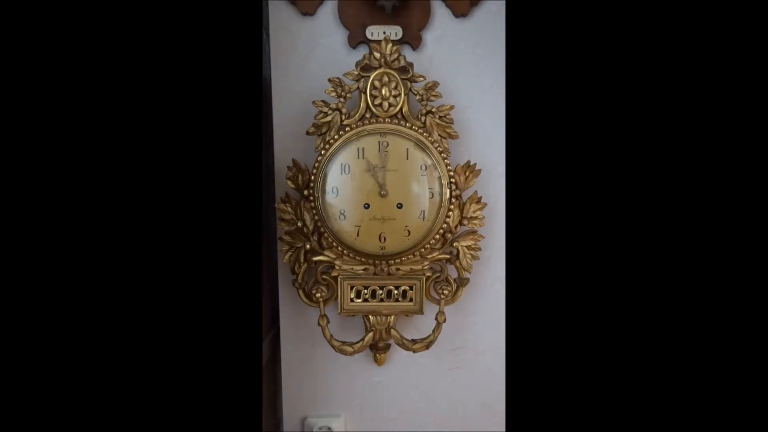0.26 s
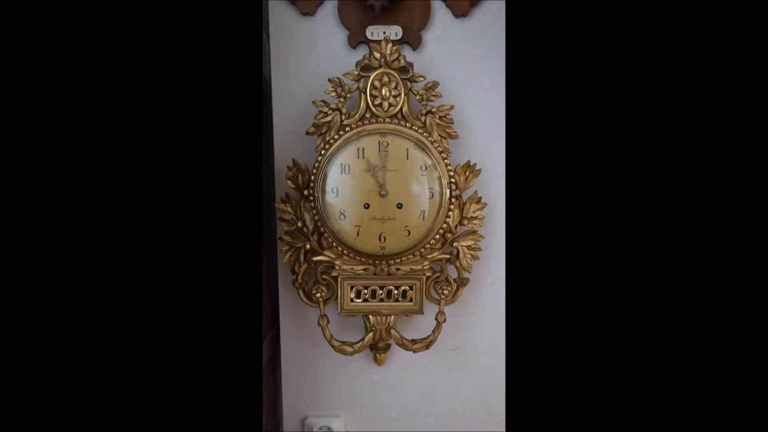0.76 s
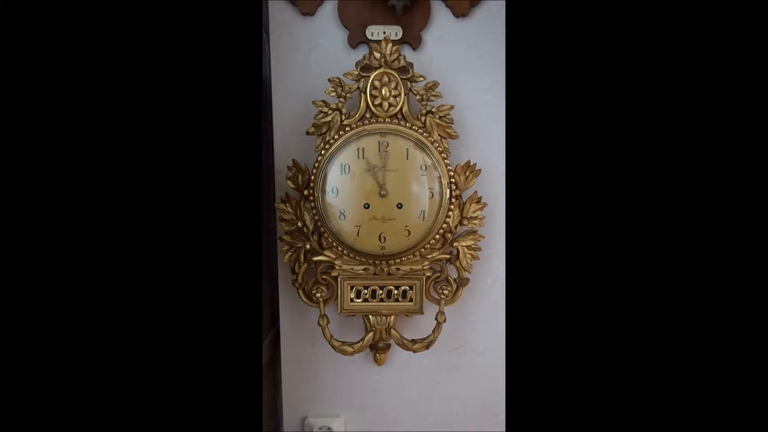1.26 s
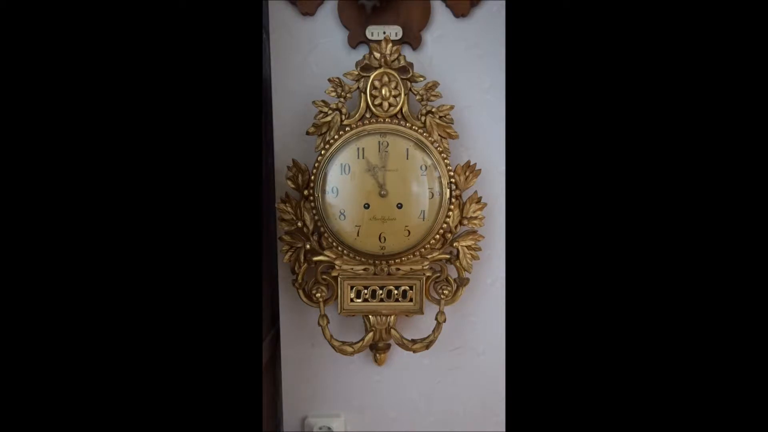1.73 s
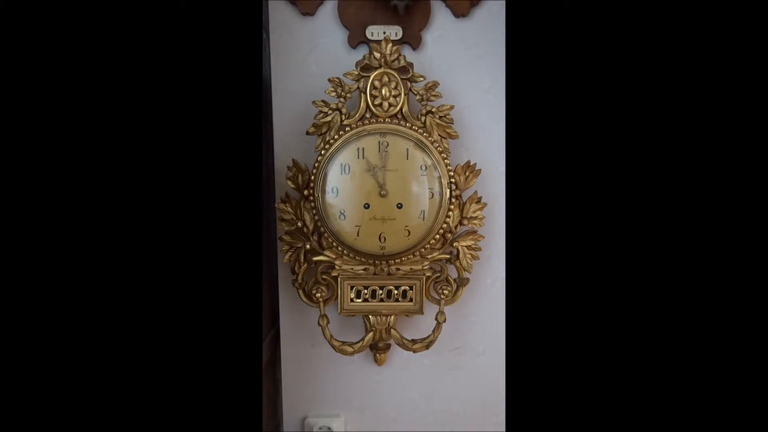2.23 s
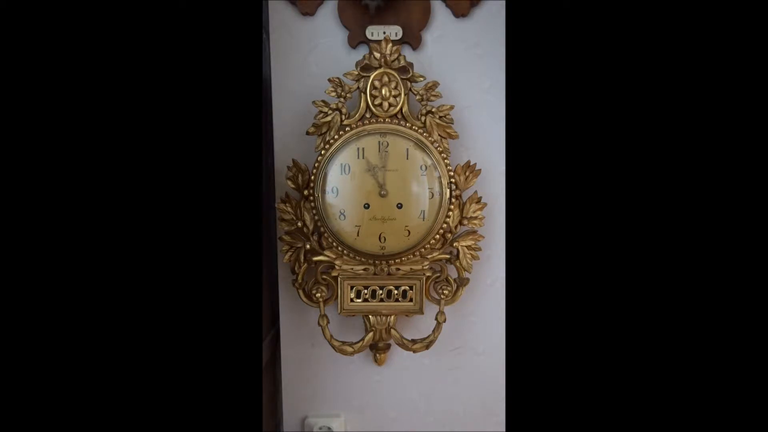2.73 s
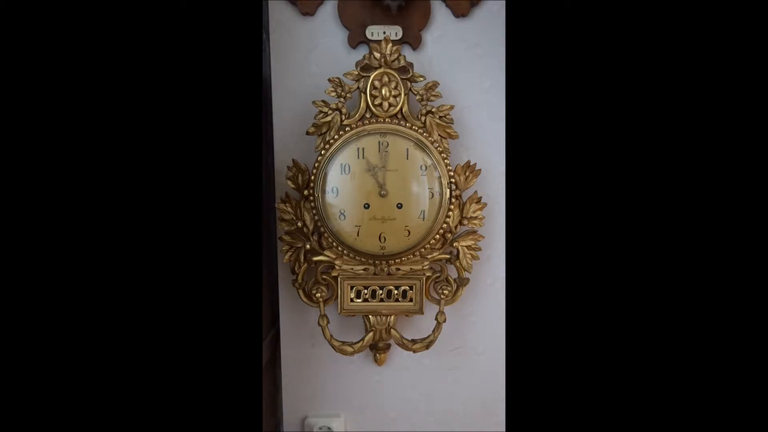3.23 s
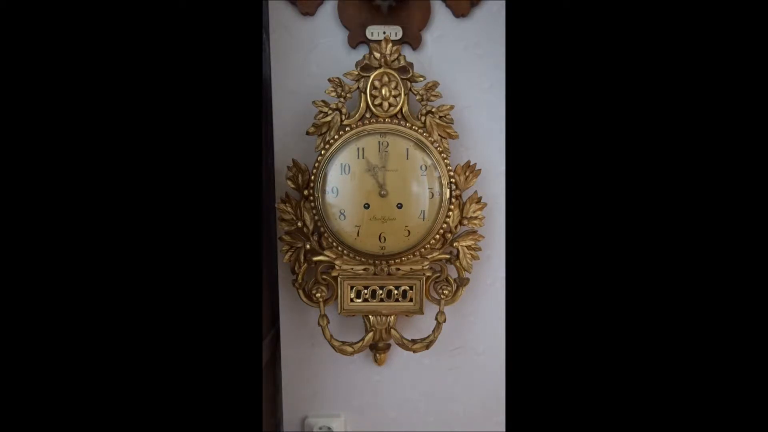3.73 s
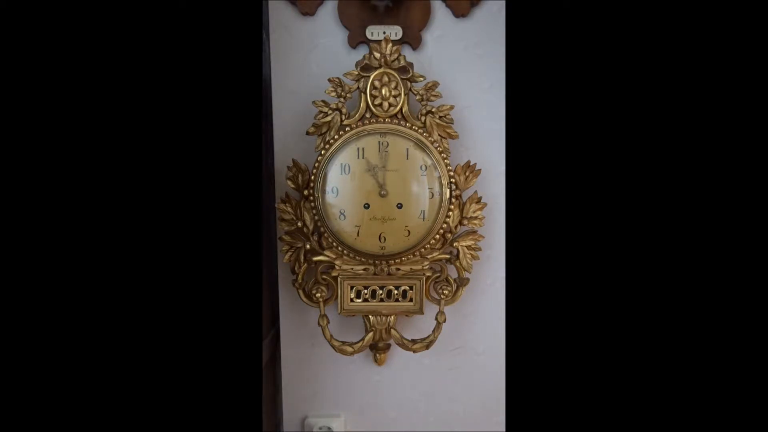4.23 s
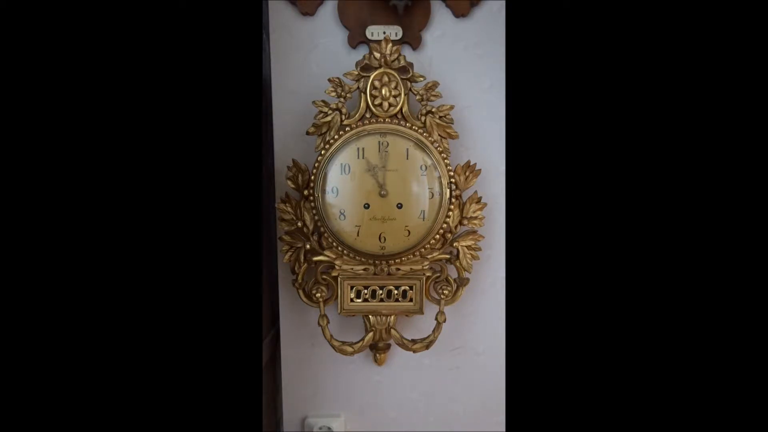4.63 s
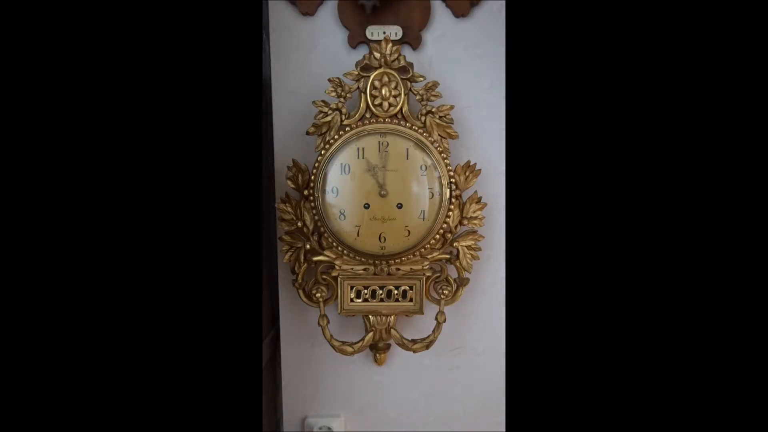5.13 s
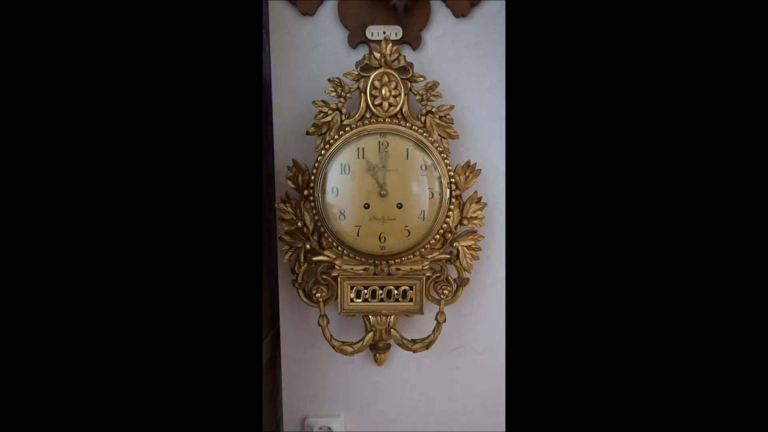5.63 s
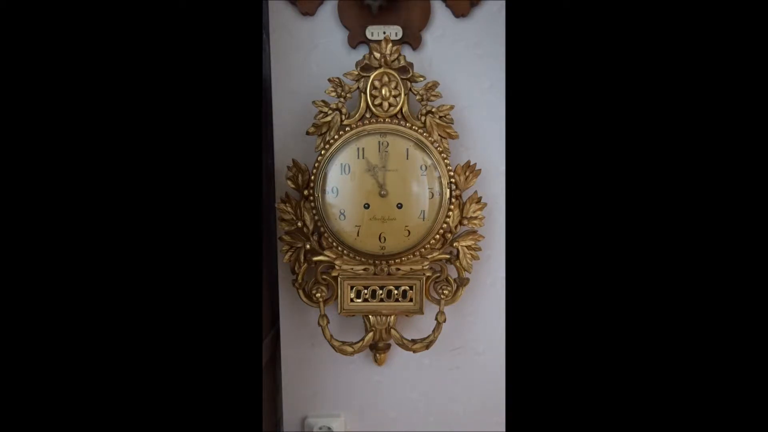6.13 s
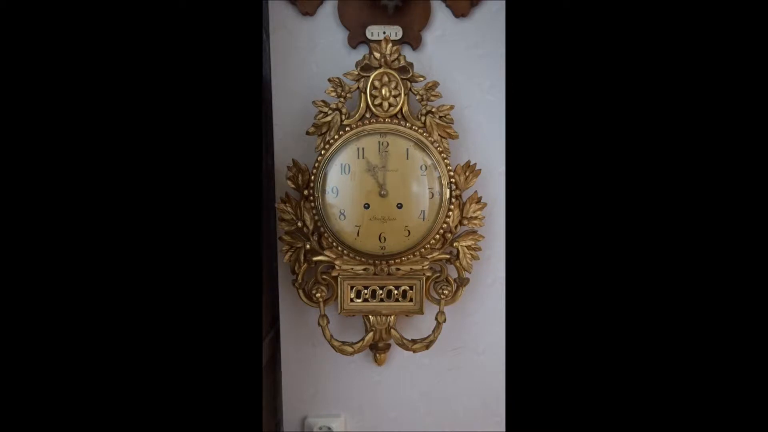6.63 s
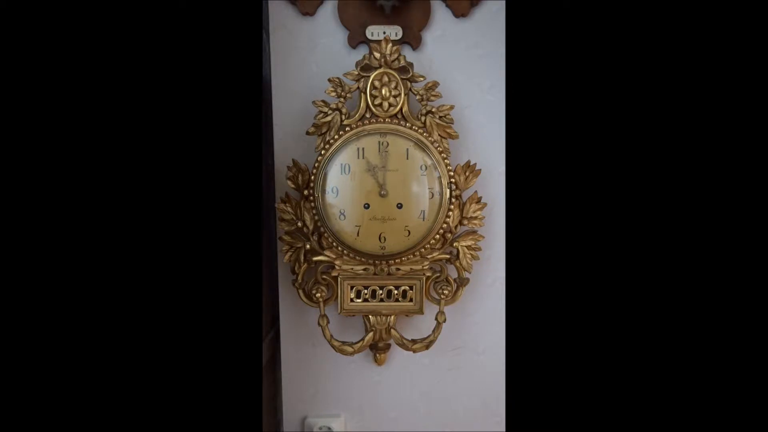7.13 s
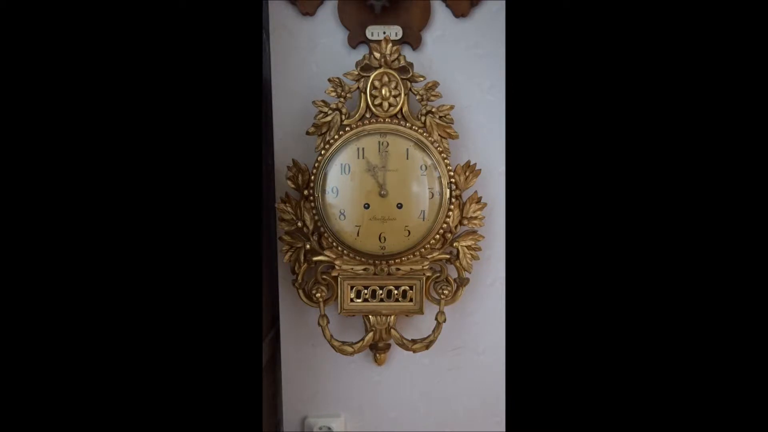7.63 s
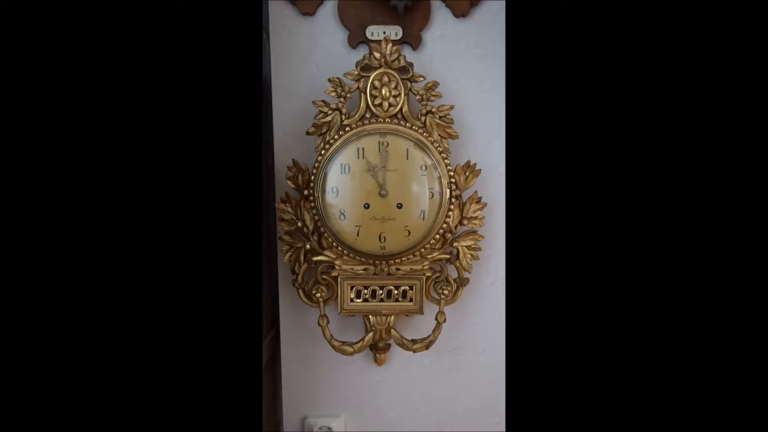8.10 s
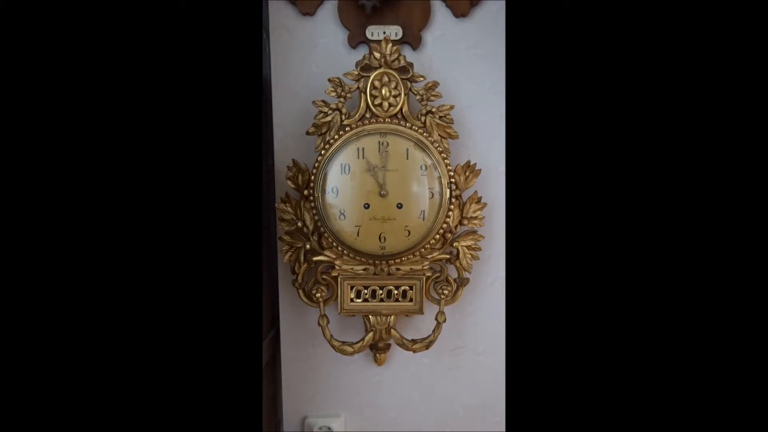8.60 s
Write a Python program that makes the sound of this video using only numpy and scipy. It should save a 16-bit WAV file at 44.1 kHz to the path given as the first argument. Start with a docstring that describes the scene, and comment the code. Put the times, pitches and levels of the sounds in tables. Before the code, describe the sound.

Quiet room, wall clock up close: latch clatter, uneven gear whirr, then six evenly spaced high metallic strikes, each with a lever click before it.

```python
"""A quiet indoor room, in stereo: dull room air, a far drone, and a wall clock with a wooden case.
The clock's glass door is shut, its striking train whirrs up, levers tick and the case thuds: all shaped noise.
A hammer strikes a small bright bell six times and chatters on it after each stroke.
The bell is four decaying tones, three of them beating against detuned twins, plus weak short-lived modes.
"""
import sys
import numpy as np
from scipy import signal
from scipy.fft import rfft, irfft, next_fast_len
from scipy.io import wavfile

SR = 44100
rng = np.random.default_rng(int(sys.argv[2]) if len(sys.argv) > 2 else 0)


def store_wav(level_fs):
    """Save 16-bit WAV to argv[1]."""
    pcm = np.round(np.clip(np.atleast_2d(level_fs), -1, 1) * 32767)
    wavfile.write(sys.argv[1], SR, pcm.T.astype(np.int16))


N = 390726
T = np.arange(N) / SR  # time of every sample [s]


def from_db(db):
    """Turn decibels into an amplitude factor."""
    return 10 ** (np.asarray(db) / 20)


def at_hz(points, hz):
    """Read a spectrum on a log-frequency axis."""
    f, value = np.transpose(points)
    return np.interp(np.log(hz + 1e-9), np.log(f), value)


def lagged(x, seconds):
    """One-pole smoothing with the given time constant."""
    r = np.exp(-1 / (seconds * SR))
    return signal.lfilter([1 - r], [1, -r], x)


def drift(rate, size=1):
    """Random curves from `rate` normal draws of spread 1 per second, joined by straight lines."""
    knots = rng.standard_normal((size, 4000))
    return np.array([np.interp(T * rate, np.arange(len(k)), k) for k in knots])


# How alike noise reaches the left and right of the microphone: (frequency [Hz], likeness [0-1])
LIKENESS = [(40, 1), (130, 0.85), (300, 0.85), (600, 0.33), (1000, 0.72), (2500, 0.47), (6000, 0.91),
            (15000, 1)]


def noise(colour, peaks=(), ripple_db=3.0, ripple_hz=14):
    """Stereo noise of rms 1 with a broad colour, narrow resonances and the fine ripple of a room's response."""
    size = next_fast_len(N)
    hz = np.arange(size // 2 + 1) * SR / size
    db = at_hz(colour, hz)
    for f, width, lift in peaks:
        db = db + lift / (1 + (2 * (hz - f) / width) ** 2)
    ripple = rng.standard_normal(4000)
    ripple_depth_db = ripple_db * np.minimum(hz / 1500, 1)
    db = db + ripple_depth_db * np.interp(hz / ripple_hz, np.arange(len(ripple)), ripple)
    alike = np.clip(at_hz(LIKENESS, hz), 0, 1)
    mid, side = rfft(rng.standard_normal((2, size)))
    left_right = np.sqrt(1 + alike) * mid + np.sqrt(1 - alike) * side * [[1], [-1]]
    out = irfft(from_db(db) * left_right, size)[:, :N]
    return out / out.std()


ROOM_T60_S = 0.57


def bursts(events, t60, room_db, rise_s):
    """Envelope of contacts: all die at one given rate and leave a tail in the room; the rise is smoothed."""
    power = np.zeros(N)
    for s, db in events:
        power[int(s * SR)] += from_db(db) ** 2

    def decaying(seconds):
        return signal.lfilter([1], [1, -from_db(-60 / (seconds * SR)) ** 2], power + 1e-18)

    direct, tail = decaying(t60), decaying(ROOM_T60_S)
    return np.sqrt(lagged(direct + from_db(room_db) ** 2 * tail, rise_s))


def after(times, pattern):
    """Repeat a pattern of (delay [s], level [dB]) after each of the times."""
    return [(s + delay, db) for s in times for delay, db in pattern]


def latest(times):
    """For every sample: which of the times came last, and the seconds since."""
    which = np.maximum(np.searchsorted(times, T) - 1, 0)
    return which, np.maximum(T - times[which], 0)


# Far drone, before its overall gain: (time [s], level [dB])
DRONE = [(0.16, -45), (0.22, -44.5), (1.23, -45.5), (1.78, -57), (1.8, -50.5), (2.61, -53), (2.98, -43),
         (3.42, -55.5), (5.3, -58)]
# Colour of the room air: (frequency [Hz], relative density [dB])
ROOM_TONE = [(20, -9), (40, -29), (70, -5), (120, -1.5), (230, -0.5), (350, 2.5), (550, -9), (1000, -8),
             (2000, -18), (4000, -20), (8000, -30.5), (16000, -35)]
DRONE_START_HZ, DRONE_END_HZ, DRONE_RISE_S = 54, 65.2, 3.6
DRONE_FADE_DB_PER_S = 12  # after the last level in the table


def room(tone_db=-45.5, drone_gain_db=1.0):
    """Dull noise for the room air, and a far sine drone whose pitch climbs, levels off and at last fades away."""
    s, db = np.transpose(DRONE)
    hz = np.interp(T, [0, DRONE_RISE_S], [DRONE_START_HZ, DRONE_END_HZ])
    fade_db = DRONE_FADE_DB_PER_S * np.maximum(T - s[-1], 0)
    level = from_db(drone_gain_db + np.interp(T, s, db) - fade_db)
    drone = np.sqrt(2) * level * np.sin(2 * np.pi * np.cumsum(hz) / SR)
    return drone + from_db(tone_db) * noise(ROOM_TONE)


# The lifting lever drops before every stroke: (time [s], level [dB])
LEVER_DROPS = [(1.678, -29.5), (2.911, -30), (4.125, -31), (5.3335, -32.5), (6.554, -31.5), (7.778, -30.5)]


def lever_drops():
    """Times at which the lifting lever drops."""
    return np.array(LEVER_DROPS)[:, 0]


# Stray soft knocks of the works: (time [s], level [dB])
KNOCKS = [(1.0, -38.5), (1.12, -40.5), (1.821, -43), (2.13, -40.5), (3.87, -40), (8.46, -44)]
# Soft booms of the hollow case: (time [s], level [dB])
BOOMS = [(.75, -40.5), (2.3, -44), (7.8, -41), (7.88, -33.5)]
# Colours of gear train, fan, lever, pendulum and boom: (frequency [Hz], relative density [dB])
TRAIN = [(100, -11.5), (220, 3), (360, 1.5), (540, -17), (760, -11.5), (930, 9.5), (1090, 2), (1350, -17),
         (1700, -10), (2050, -0.5), (2700, -33.5), (7000, -26.5), (16000, -34.5)]
FAN = [(300, -18), (1500, -22), (3000, -5.5), (7000, 3.5), (9500, -7.5), (11500, 5.5), (14500, 2.5),
       (16000, -8.5)]
LEVER = [(200, -10.5), (1000, 2), (1600, 9.5), (3000, -12), (5500, -7), (9000, -7), (12000, 3),
         (16000, -8.5)]
TICK_TOCK = [(200, -17), (1000, -2.5), (2200, -5), (3500, -0.5), (4800, -10.5), (8000, -10.5), (15000, -16)]
BOOM = [(60, -27), (150, -16.5), (235, -5.5), (330, -17), (500, -27.5), (1500, -34), (16000, -66)]
# Narrow metallic resonances of the movement: (frequency [Hz], width [Hz], lift [dB])
WORKS = [(2850, 150, 9), (4000, 180, 7.5), (5170, 660, 7), (6700, 130, 8.5), (7985, 670, 11.5),
         (8610, 390, 12), (11820, 450, 9), (13050, 260, 5)]
# Low resonances of the wooden case: (frequency [Hz], width [Hz], lift [dB])
CASE_MODES = [(148, 12, -0.5), (214, 16, 4.5), (250, 25, 5), (285, 25, -13), (314, 16, 5.5), (351, 4, 7),
              (630, 12, 14), (940, 72, 0.5), (973, 47, -4.5), (1069, 34, 8)]
# The train's level ramps up on release; the load and flutter in movement() act on top of these levels
RELEASE_S, SPIN_UP_S, IDLE_DB, RUNNING_DB = .5, .3, -50.5, -43.5
# The pendulum's uneven tick-tock: first tick, full swing, tick to tock
FIRST_TICK_S, SWING_S, TOCK_S, PENDULUM_DB = .533, 1.85, .992, -42.5
# The lever bounces once after it drops
LEVER_BOUNCE_S, LEVER_BOUNCE_LOSS_DB = 0.015, 8


def movement(flutter_db=2.0, flutter_rate=22, load_db=3.0, fan_db=-49):
    """The gear train whirrs unevenly, louder while it lifts the hammer; levers tick and the pendulum swings."""
    lifting = sum(np.exp(-((T - s + 0.11) / 0.23) ** 2) for s in blows())  # peaks 0.11 s before a blow
    running = from_db(np.interp(T, [RELEASE_S, RELEASE_S + SPIN_UP_S], [IDLE_DB, RUNNING_DB]))
    uneven = from_db(load_db * (lifting - 1) + flutter_db * drift(flutter_rate))
    gears = running * uneven * noise(TRAIN, CASE_MODES)
    fan = from_db(fan_db) * running / np.median(running) * noise(FAN, WORKS)

    bounces = [(s + LEVER_BOUNCE_S, db - LEVER_BOUNCE_LOSS_DB) for s, db in LEVER_DROPS]
    ticks = bursts(LEVER_DROPS + bounces, t60=0.035, room_db=-15.0, rise_s=.0006) * noise(LEVER, WORKS)

    first_tick_and_tock = (FIRST_TICK_S, FIRST_TICK_S + TOCK_S)
    escapes = [(s, PENDULUM_DB) for first in first_tick_and_tock for s in np.arange(first, N / SR, SWING_S)]
    tick_tock = bursts(escapes, t60=0.087, room_db=-5.5, rise_s=.002) * noise(TICK_TOCK)

    all_knocks = after(lever_drops(), [(.008, -38.5)]) + KNOCKS  # each lever drop also knocks
    knocks = bursts(all_knocks, t60=0.093, room_db=-0.5, rise_s=0.0015) * noise(DOOR_COLOUR)
    booms = bursts(BOOMS, t60=0.55, room_db=-5.5, rise_s=0.009) * noise(BOOM, CASE_MODES)
    return gears + fan + ticks + tick_tock + knocks + booms


# The door meets its rim and latches: (time [s], level [dB])
DOOR = [(.214, -25.5), (.229, -24.5), (.238, -24.5), (.251, -30)]
# The case settles after the door has shut: (time [s], level [dB])
SETTLING = [(.30, -37.5), (.41, -38)]
# Colours of door (also of the knocks) and settling wood: (frequency [Hz], relative density [dB])
DOOR_COLOUR = [(35, -36), (60, -3.5), (149, -19), (238, 0.5), (308, -4), (380, -4.5), (749, -13), (903, 2),
               (1550, -21), (2350, -10), (2840, -23), (5460, -22), (6000, -27), (7060, -20), (16000, -24)]
WOOD = [(100, -13), (350, -2.5), (600, -4), (850, -20), (1400, -14), (2500, -17.5), (6000, -31),
        (16000, -41)]


def door():
    """The glazed brass door closes with a short resonant clatter and the case settles with duller noise."""
    # (frequency [Hz], width [Hz], lift [dB])
    resonances = [(245, 26, 3.1), (927, 63, 3.6), (2380, 30, 7.9), (2560, 62, 8.7)]
    latch = bursts(DOOR, t60=0.13, room_db=-12, rise_s=0.0017) * noise(DOOR_COLOUR, resonances)
    return latch + bursts(SETTLING, t60=0.47, room_db=-13, rise_s=0.028) * noise(WOOD)


# The hammer arm falls back and shakes the case: (time after the blow [s], level [dB])
THUDS = [(.023, -36.5), (.075, -37.5)]
# The arm clatters against its stop: (time after the blow [s], level [dB])
CLATTER = [(.074, -36.5)]
# Stray scrapes of the works: (time [s], level [dB])
SCRAPES = [(1.1, -47.5), (3.86, -47), (6.716, -44), (8.46, -50)]
# Colours of hammer click, scrape (also the clatter) and case: (frequency [Hz], relative density [dB])
CLICK = [(100, -13), (500, -31), (750, -17.5), (990, 10), (1350, -7), (2000, -19), (3000, -12.5),
         (3750, -1.5), (4250, -4), (5100, 1.5), (6000, -3.5), (8000, 1), (13000, -7), (16000, -6)]
SCRAPE = [(200, -21.5), (700, 2), (1400, 5.5), (2300, 5), (3000, 1.5), (4200, 3.5), (6000, -23),
          (15000, -23.5)]
CASE = [(30, -21.5), (55, -12.5), (78, 7.5), (120, -7.5), (230, 0), (350, 7), (530, -13), (900, -6),
        (1500, -15.5), (2300, -19.5), (3500, -13), (6000, -38), (16000, -35.5)]


def hammer(click_gain_db=-1, rattle_db=3.0, rattle_rate=160):
    """Hard clicks of metal on metal, clatter and scrapes, and the duller rattling of the wooden case."""
    contacts = bursts(touches(), t60=0.046, room_db=-14.0, rise_s=0.00029)
    clicks = from_db(click_gain_db) * contacts * noise(CLICK, WORKS)
    clatter = bursts(after(blows(), CLATTER), t60=0.19, room_db=-7.5, rise_s=0.0033)
    all_scrapes = after(lever_drops(), [(.001, -51)]) + SCRAPES  # each lever drop also scrapes
    scrapes = bursts(all_scrapes, t60=0.33, room_db=-4, rise_s=0.0036)
    shaking = bursts(after(blows(), THUDS), t60=0.8, room_db=-2, rise_s=0.0049)
    shaking = shaking * from_db(rattle_db * drift(rattle_rate))
    return clicks + (clatter + scrapes) * noise(SCRAPE) + shaking * noise(CASE, CASE_MODES)


# Weak, short-lived modes of bell and hammer: (frequency [Hz])
OVERTONE_HZ = [935, 4900, 5120, 6740, 8125, 8191, 12130, 12214, 12390, 12913]
# The same modes, before a random spread: (level against the touch [dB], t60 [s])
OVERTONES = [(-16.5, 0.14), (-15, 0.083), (-35, 0.057), (-15.5, 0.032), (-26, 0.17), (-26, .2), (-19, .1),
             (-14, 0.14), (-8, 0.19), (-16.5, .13)]


def overtones(spread_db=6.5):
    """Each touch rings the weak modes as two-pole resonators, every time with randomly different strengths."""
    s, touch_db = touches().T
    out = np.zeros((2, N))
    for hz, (db, t60) in zip(OVERTONE_HZ, OVERTONES):
        impulses = np.full((2, N), 1e-18)
        random_db = spread_db * rng.standard_normal((len(s), 2)).T
        impulses[:, (s * SR).astype(int)] = from_db(touch_db + db + random_db)
        r = np.exp(-np.log(1000) / (t60 * SR))
        w = 2 * np.pi * hz / SR
        out += signal.lfilter([0, np.sin(w)], [1, -2 * r * np.cos(w), r * r], impulses)
    return out


# The six strokes: (time [s], strength, added to partials 1-3 while under the hammer [dB], rebound level [dB],
# ring left in partials 1, 2, 3, 4 [dB], twin share of partials 1, 2 [0-1], beat shift of partials 1, 3 [s])
STROKES = [(1.9074, -2.5, -33, -37.5, -21.5, -6, -18.5, 0.45, .2, 0.02, -0.0098),
           (3.1304, 0, -23, -35.5, -22.5, -7, -25, .28, 0.1, 0.01, -0.01),
           (4.3447, -2, -21, -43.5, -24.5, -11, -28, 0.94, 0.38, -0.062, -0.17),
           (5.5495, 0.3, -43.5, -38.3, -20.5, -4, -21, 0.61, 0.3, -0.021, -0.0027),
           (6.775, 0, -18, -37, -27.5, -10.5, -21.5, .27, 0, -0.014, -0.13),
           (7.9942, 0, -34, -37.5, -26, -4, -25.5, 0.55, 0.37, 0.012, 0.047)]


def blows():
    """Times of the strokes."""
    return np.array(STROKES)[:, 0]


# The hammer touches the bell once more: (time [s], level [dB],
# change of the partials until the next blow, before each partial's share [dB])
LATE_TOUCHES = [(4.456, -22, -1), (4.509, -32.5, 6), (6.92, -24, -1), (6.982, -33, -5),
                (8.198, -31.5, -1.2)]
# After every blow the hammer bounces lightly, then rebounds onto the bell
BLOW_DB, BOUNCE_S, BOUNCE_DB, REBOUND_S = -16, .036, -27, .072


def rebounds():
    """The hammer falls back on the ringing bell: rows (time [s], level [dB])."""
    regular = [(s + REBOUND_S, db) for s, strength, db, *ring in STROKES]
    return np.array(sorted(regular + [(s, db) for s, db, change in LATE_TOUCHES]))


def touches():
    """Every contact of hammer and bell: rows (time [s], level [dB])."""
    struck = after(blows(), [(0, BLOW_DB), (BOUNCE_S, BOUNCE_DB)])
    return np.array(sorted(struck + [tuple(row) for row in rebounds()]))


# Choke by a rebound or late touch as hard as the blow, before each partial's share
CHOKE_DB, CHOKE_S = 14, 0.032


def hammer_damping():
    """Level change in dB: a brief choke at each rebound or late touch; late touches also last until the next blow."""
    stroke, _ = latest(blows())
    rebound, since_rebound = latest(rebounds()[:, 0])
    hardness = from_db(rebounds()[rebound, 1] - BLOW_DB)
    choke_db = CHOKE_DB * hardness * np.exp(-(since_rebound / CHOKE_S) ** 2)
    lasting_db = sum(change * (T > s) * (stroke == stroke[int(s * SR)]) for s, db, change in LATE_TOUCHES)
    return lasting_db - choke_db


def ears(left_db, left_lead):
    """Strength and phase of a tone at left and right; the right is the reference."""
    return from_db([[left_db], [0]]) * np.exp(1j * np.array([[left_lead], [0]]))


def partial(hz, envelope, ruffle, attack_s, scatter_hz=110):
    """A stereo tone, ruffled at random as wall reflections arrive."""
    scatter = drift(scatter_hz) + 1j * drift(scatter_hz) + .5 * drift(scatter_hz, size=2)
    ring = lagged(envelope * (T > blows()[0]) * (1 + ruffle * scatter), attack_s)
    return np.sqrt(2) * np.real(ring * np.exp(2j * np.pi * hz * T))


# Pitch of the bell's four partials: (frequency [Hz])
PARTIAL_HZ = [1921.1, 4738.8, 8251.7, 12341.6]
# Signed distance of each twin from its partial: (frequency [Hz])
TWIN_HZ = [2.17, -4.96, 2.2]
# The three beating partials: (level under the hammer [dB], t60 [s], swell as the room fills [dB], attack [s],
# share of the hammer's damping [0-1], first lull [s], left level [dB], twin's left level [dB],
# left lead [radians], ruffle after a touch [0-1], slow sway [dB])
PARTIALS = [(-35, 37, 5.5, 0.011, 0.15, 0.01, -1.04, -0.5, 0.13, 0.52, 0),
            (-30.5, 6.46, -6, 0.0017, 0, .17, -10.5, -7.5, 1.46, 0.29, 2.2),
            (-7, 1.708, 4.5, 0.0019, 0.97, 0.027, -0.6, 0.6, 0.16, 0.05, 0.5)]
SWAY_PERIOD_S, SWAY_LOW_S = .94, 2.85  # sway period, and the time of one low point
MAIN_TWIN_SHARE = 0.27  # twin of partial 3, the main one
# The top partial has no twin; every touch renews it, and it holds briefly before it dies
TOP_DB, TOP_HOLD_S, TOP_T60_S, TOP_LEFT_DB, TOP_LEAD_RAD, TOP_RUFFLE = -20.5, 0.067, 0.64, 1, .38, 0.44


def bell(fill_s=0.084, scatter_t60=0.37, waver=0.035):
    """Each blow drives the partials; after the rebound they ring on, three beating against detuned twins."""
    stroke, since_stroke = latest(blows())
    _, since_touch = latest(touches()[:, 0])
    columns = np.array(STROKES)[stroke].T
    _, strength_db, _, *ring_db, top_db, low_share, middle_share, low_shift, main_shift = columns
    shares = (low_share, middle_share, MAIN_TWIN_SHARE)
    shifts = (low_shift, 0, main_shift)
    free = since_stroke > REBOUND_S
    filled = 1 - np.exp(-since_stroke / fill_s)
    unsettled = from_db(-60 * since_touch / scatter_t60)
    damping_db = hammer_damping()
    sway = -np.cos(2 * np.pi * (T - SWAY_LOW_S) / SWAY_PERIOD_S)

    out = np.zeros((2, N))
    for k, row in enumerate(PARTIALS):
        struck_db, t60, swell_db, attack_s, damped, lull = row[:6]
        left_db, twin_left_db, left_lead, scatter, sway_db = row[6:]
        fade_db = -60 * since_stroke / t60
        free_db = ring_db[k] + fade_db + swell_db * filled + sway_db * sway + damped * damping_db
        level = from_db(np.where(free, free_db, struck_db + strength_db))
        turns = TWIN_HZ[k] * (since_stroke - lull - shifts[k])  # whole turns are lulls at the right
        twin = free * shares[k] * from_db([[twin_left_db], [0]]) * np.exp(2j * np.pi * turns)
        envelope = level * (ears(left_db, left_lead) - twin)
        out += partial(PARTIAL_HZ[k], envelope, scatter * unsettled + waver, attack_s)

    top_fade_db = -60 * np.maximum(since_touch - TOP_HOLD_S, 0) / TOP_T60_S
    top = from_db(np.where(free, top_db, TOP_DB) + top_fade_db) * ears(TOP_LEFT_DB, TOP_LEAD_RAD)
    return out + partial(PARTIAL_HZ[-1], top, TOP_RUFFLE * unsettled + waver, attack_s=0.00046)


def scene():
    """Room, clock and bell together; all but the bell's tones lean slightly to the left."""
    surroundings = room() + movement() + door() + hammer()
    return surroundings * from_db([[.4], [-.4]]) + overtones() + bell()


START_S, CUTOFF_HZ = .143, 15900


def record(dry):
    """The microphone opens after a moment; a steep low-pass cuts the top."""
    opened = lagged(1.0 * (T > START_S), 0.0004)
    low_pass = signal.ellip(10, .1, 80, CUTOFF_HZ, fs=SR, output="sos")
    return signal.sosfilt(low_pass, dry * opened)


dry = scene()
out = record(dry)
store_wav(out)
```